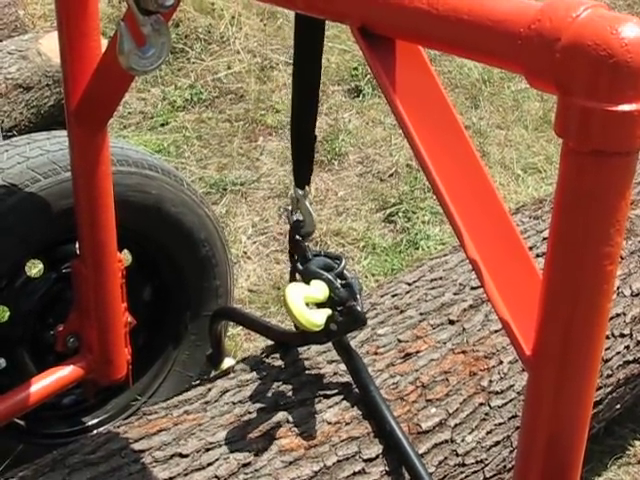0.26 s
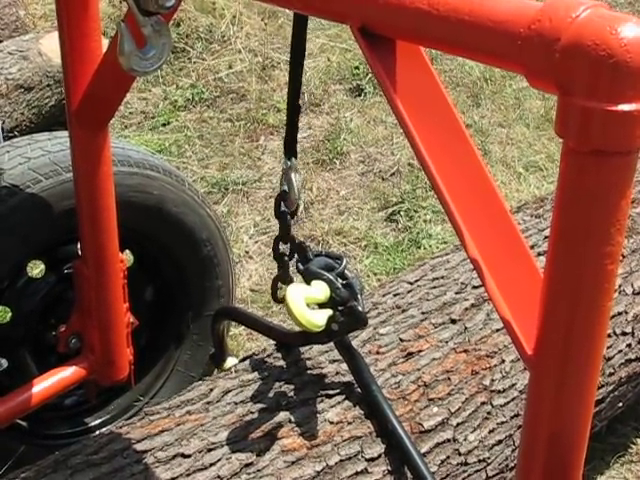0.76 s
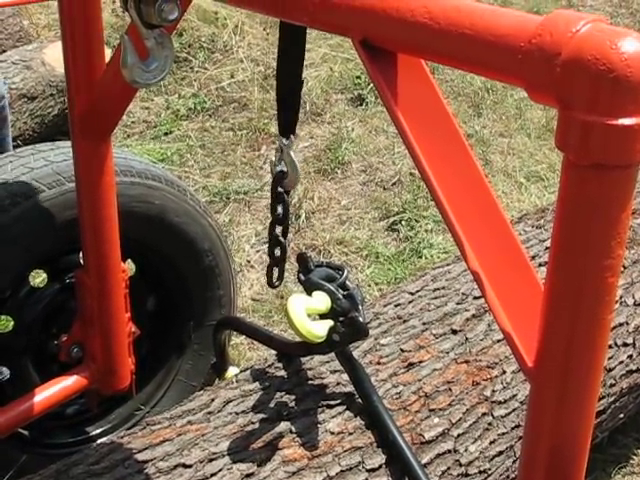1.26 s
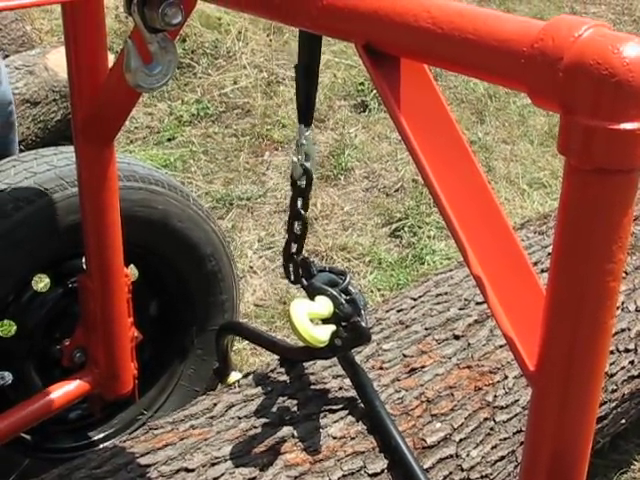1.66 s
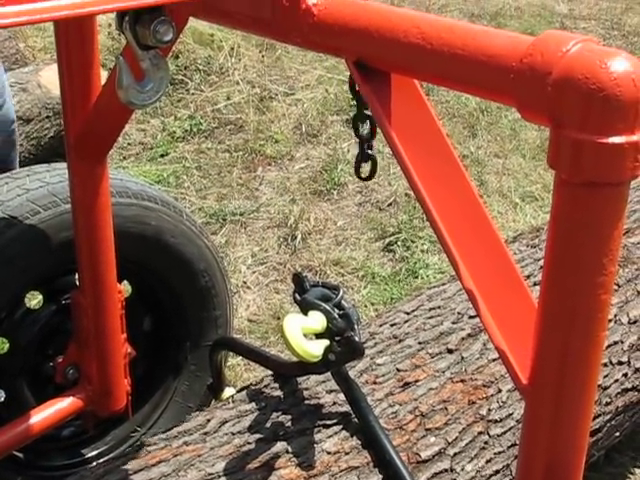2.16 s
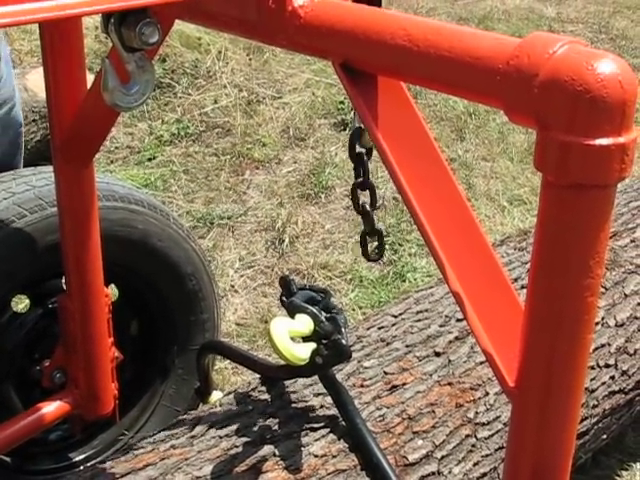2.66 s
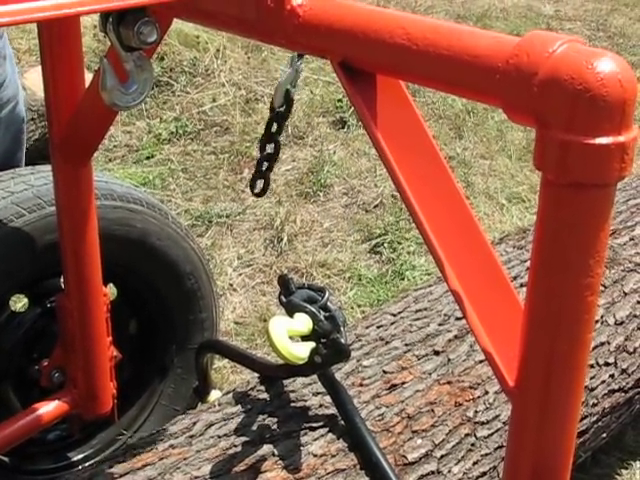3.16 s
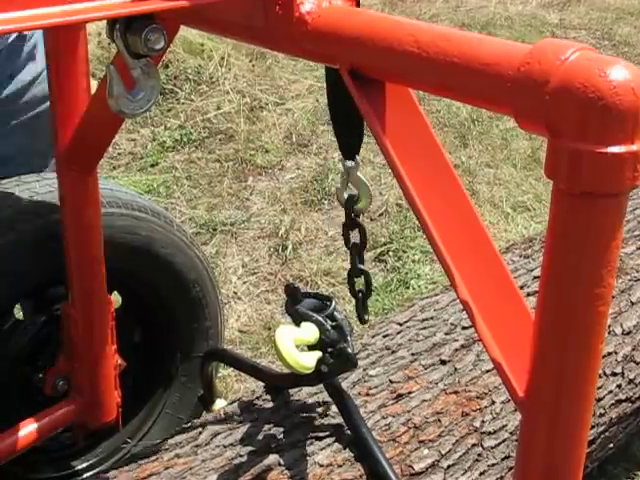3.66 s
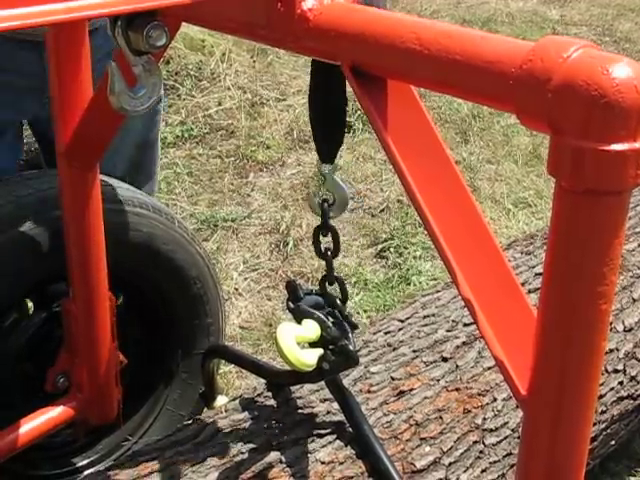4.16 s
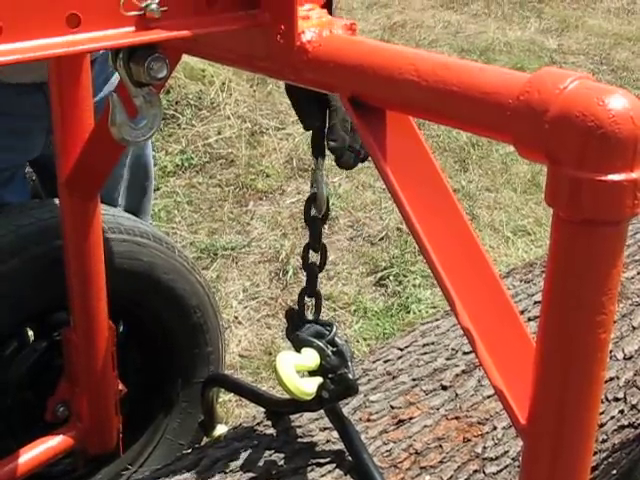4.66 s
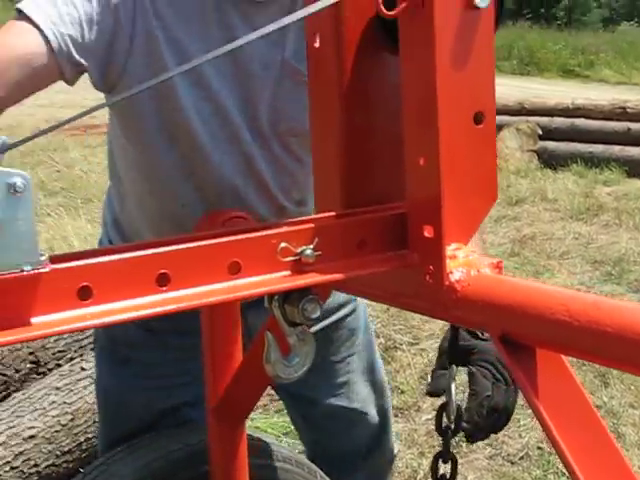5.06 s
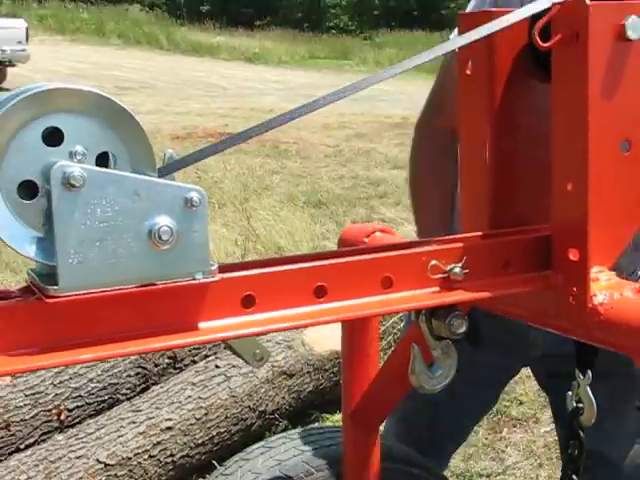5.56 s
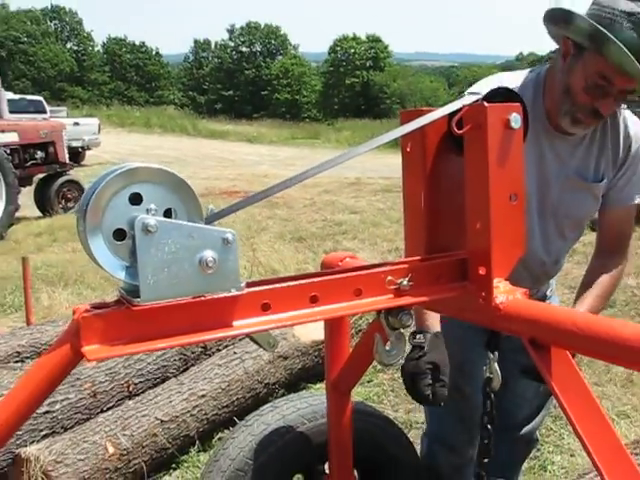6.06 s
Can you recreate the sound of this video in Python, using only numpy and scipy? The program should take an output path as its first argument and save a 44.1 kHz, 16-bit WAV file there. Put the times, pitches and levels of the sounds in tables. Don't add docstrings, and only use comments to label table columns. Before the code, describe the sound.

A close hand winch on a steel frame, in an open field. One hard metallic clack comes at once, then dull knocks up to 0.5 s. From 0.5 to 1.4 s about fifteen loud, bright ratchet clicks run at roughly fifteen a second, each snapping and ringing briefly through drum and tubes. Small ticks follow; from 1.85 s wind rumbles on the microphone and loose chain scrapes and jingles, with a stronger clink near 2.9 s. Faint birds whistle between 2.3 and 3.5 s, and insects hiss briefly near 2.8 s. A second burst of twenty-five clicks runs from 3.55 to 5.3 s, slower and uneven at first, then quickening, with tiny axle creaks. Knocks near 5.5 s and soft hand thumps and ticks at 6.2 s end it. Thin air, a high steady tone and distant machine drone and hum duck under clicks, then recover.

```python
import sys
import numpy as np
from scipy import signal
from scipy.fft import rfft, irfft, next_fast_len
from scipy.io import wavfile
from scipy.ndimage import uniform_filter1d, minimum_filter1d, map_coordinates

SR = 44100
rng = np.random.default_rng(int(sys.argv[2]) if len(sys.argv) > 2 else 0)


def convert_level_to_amplitude(level_db):
    exponent = np.asarray(level_db, float) / 20
    return 10 ** exponent


def log_audio(samples):
    frames = np.atleast_2d(samples).T
    limited = np.clip(frames, -1, 1)
    pcm = np.round(limited * 32767).astype(np.int16)
    wavfile.write(sys.argv[1], SR, pcm)


N = 278712
HZ = np.fft.rfftfreq(next_fast_len(N + SR), 1 / SR)
BURST_HZ = np.fft.rfftfreq(128, 1 / SR)

# t/s, peak level/dB, edge ring re peak/dB, thud re peak/dB, bell ring/dB
LONE = [
    (0.0262, -5.5, -10, -41, -7),
]
FIRST = [(0.508, -4, -12, -36, -2), (0.5698, -5.0, -14, -40, 5.5), (0.6264, -4, -12.5, -46.5, 0.5),
         (0.6829, -3.5, -13.5, -47, 1), (0.7351, -3, -13, -46.5, -6.5), (0.7856, -5.5, -14, -49.5, -2),
         (0.838, -4, -12.5, -32.5, 10), (0.8992, -3, -12.5, -50, 5), (0.963, -2, -11, -37, 3.5),
         (1.0272, -5.0, -9.5, -54, 3.5), (1.099, -5, -12.5, -35.5, -2), (1.1713, -4, -14, -38, 3),
         (1.2355, -4.5, -15, -34, 3), (1.2971, -6, -12, -45.0, -2), (1.3784, -6, -9.5, -32.5, 1.5)]
SECOND = [(3.5592, -4.5, -10.5, -37, 3.5), (3.6314, -6, -6.5, -33, 3.5), (3.7119, -4, -11, -37, 0.5),
          (3.8333, -4.5, -10.5, -35, -3.5), (3.9383, -3.5, -14, -59, -5.5), (4.0289, -3.5, -16, -53, -1),
          (4.1268, -6, -10, -39, 2.5), (4.2151, -5, -14.0, -61.0, -5), (4.275, -3.5, -14.5, -50, -0.5),
          (4.3199, -4, -12.5, -48, -2), (4.3681, -6, -14.5, -44, 2), (4.4258, -4.0, -11, -45, 2.5),
          (4.4921, -3.5, -13, -31, -0.5), (4.5682, -4, -9, -31, 3), (4.6702, -5.5, -10, -60, 2.5),
          (4.7774, -5, -9.5, -38, -4.5), (4.8686, -5, -12, -38, 0.5), (4.9353, -3.5, -12, -47.5, -0.5),
          (4.9898, -4.5, -14.5, -45, 4.5), (5.0377, -5.0, -11, -44.5, 1), (5.081, -5.5, -14.5, -45, -6),
          (5.1215, -5, -10, -45, 2), (5.1637, -4.5, -18.5, -52, -1), (5.2083, -1.5, -15.5, -48.5, 0.0),
          (5.2714, -4.5, -11, -70.0, 3)]
DROPS = LONE + FIRST + SECOND


def unit(x):
    return x / np.sqrt(np.mean(x ** 2) + 1e-20)


def along(points, hz):
    f, v = np.transpose(points)
    return np.interp(np.log(hz + 1), np.log(f + 1), v)


def curves(rows):
    s, *cols = np.transpose(rows)
    return [np.interp(np.arange(N) / SR, s, c) for c in cols]


def wobble(rate):
    knots = rng.standard_normal(int(N * rate / SR) + 4)
    return map_coordinates(knots, [np.arange(N) * rate / SR])


def filtered(x, response):
    m = 2 * len(HZ) - 2
    return irfft(rfft(x, m) * response, m)[..., :N]


def add(track, s, sound):
    part = track[..., round(s * SR):round(s * SR) + sound.shape[-1]]
    part += sound[..., :part.shape[-1]]


def ring(hz, db, t60, t, attack, scatter_db):
    hz, db, t60 = (np.asarray(v)[:, None] for v in (hz, db, t60))
    strength, phase = rng.standard_normal((2, len(hz), 1))
    decay = convert_level_to_amplitude(db + scatter_db * strength - 60 * t / t60)
    waves = decay * np.sin(2 * np.pi * hz * t + 9 * phase)
    return waves.sum(0) * (1 - np.exp(-t / attack))


def puff(colour_db, t60, t, rise, alike):
    a, b = rng.standard_normal((2, len(t)))
    pair = [a, alike * a + np.sqrt(1 - alike ** 2) * b]
    _, frames, z = signal.stft(pair, SR, nperseg=128)
    gain = convert_level_to_amplitude(colour_db)
    gain = gain / np.sqrt(np.mean(gain ** 2))
    t60 = np.broadcast_to(t60, BURST_HZ.shape)[:, None]
    z = z * gain[:, None] * convert_level_to_amplitude(-60 * frames / t60)
    burst = signal.istft(z, SR, nperseg=128)[1][:, :len(t)]
    return burst * (1 - np.exp(-(t / rise) ** 2))


def rush(spectrum, alike, patchy_db):
    z = signal.stft(rng.standard_normal((2, N)), nperseg=512)[2]
    patches = uniform_filter1d(rng.standard_normal(z.shape[1:]), 6, 0)
    patches = uniform_filter1d(patches, 14, 1)
    pair = signal.istft(z * convert_level_to_amplitude(patchy_db * unit(patches)), nperseg=512)[1][:, :N]
    turn = np.arccos(np.clip(along(alike, HZ), -1, 1)) / 2
    mid, side = filtered(pair, convert_level_to_amplitude(along(spectrum, HZ)) * [np.cos(turn), np.sin(turn)])
    return unit(np.array([mid + side, mid - side]))


def whistles(notes, arch):
    out = np.zeros(N)
    for s, length, start_hz, end_hz, db in notes:
        u = np.linspace(0, 1, round(length * SR))
        pitch = (start_hz + (end_hz - start_hz) * u) * (1 + 4 * arch * u * (1 - u))
        wave = np.sin(2 * np.pi * np.cumsum(pitch) / SR)
        add(out, s, convert_level_to_amplitude(db + 2) * np.sin(np.pi * u) ** .6 * wave)
    return out * convert_level_to_amplitude(4 * wobble(150))


def camera_gain_db():
    deepest_db, load_per_click = 13, 1.17
    memory_s, grab_s = 0.36, 0.022
    t = np.arange(0, N / SR, .002)
    age = np.maximum(t - np.array([row[0] for row in DROPS])[:, None], 0)
    load = load_per_click * (np.exp(-age / memory_s) * (1 - np.exp(-age / grab_s))).sum(0)
    return np.interp(np.arange(N) / SR, t, -deepest_db * (1 - np.exp(-load)))


def hum():
    # f/Hz, level/dB, drift rate/(1/s)
    partials = [(133, 6, 1.5), (183, -2, 9), (264, -9, 7), (404, -11, 9)]
    t = np.arange(N) / SR
    total = np.zeros(N)
    for hz, db, rate in partials:
        strength = convert_level_to_amplitude(db + 5.4 * wobble(rate))
        total += strength * np.sin(2 * np.pi * hz * t + 1.8 * wobble(rate))
    return unit(total)


def field():
    # f/Hz, spectral level/dB
    air_colour = [(120, -17), (170, -6.5), (300, -20), (600, -17.5), (1000, -21), (2200, -21),
                  (4000, -22.5), (6500, -26.5), (8700, -24.5), (9100, -35), (12600, -38), (13400, -34.5),
                  (15750, -34), (15900, -70)]
    # f/Hz, coherence/1
    air_alike = [(60, -0.18), (240, 1), (950, 0.93), (3770, -0.17), (15000, 1)]
    # f/Hz, spectral level/dB
    drone_colour = [(250, -18.5), (340, 2), (480, -6), (650, -9.5), (780, 1.5), (950, -6), (1300, -17.5),
                    (2000, -59)]
    # t/s, drone level/dB, hum level/dB
    machine = [(0, -65, -73), (.3, -51.5, -50), (.9, -37.5, -70), (1.45, -39.5, -65), (1.75, -67.5, -84),
               (2.3, -54.5, -52.5), (2.6, -55.5, -50.5), (3, -70, -51), (3.5, -53, -60),
               (4.5, -39.5, -61.5), (5.3, -53, -72), (5.55, -43.5, -55), (6.32, -53, -82)]
    # f/Hz, spectral level/dB
    buffet = [(12, -27.5), (20, -1), (75, 2.5), (172, -9.5), (216, -23.5), (300, -13.5), (390, -54.5),
              (660, -120)]
    # t/s, level/dB
    gusts = [(0, -59.5), (.12, -70.5), (.4, -55.5), (.7, -62), (1.2, -66), (1.78, -63.5), (1.85, -37),
             (2.22, -44), (2.32, -52), (2.42, -51), (3.04, -52.5), (3.13, -45.5), (3.55, -55), (3.9, -72.5),
             (4.5, -51), (5.3, -67), (5.9, -71), (6.32, -58)]
    drone_db, hum_db = curves(machine)
    air = convert_level_to_amplitude(-51.5 + .4 * wobble(6)) * rush(air_colour, air_alike, patchy_db=1.1)
    tone_phase = 2 * np.pi * 8252 * np.arange(N) / SR + .3 * wobble(60)
    tone = convert_level_to_amplitude(-55.5 + 1.5 * wobble(30)) * np.sin(tone_phase)
    drone = convert_level_to_amplitude(drone_db) * rush(drone_colour, [(500, 0.25)], patchy_db=1.8)
    lumps = convert_level_to_amplitude(3.5 * np.array([wobble(9), wobble(11)]))
    wind = convert_level_to_amplitude(curves(gusts)[0] - 1.0) * unit(lumps * rush(buffet, [(30, 0.13)], patchy_db=1.0))
    total = air + tone + drone + wind + convert_level_to_amplitude(hum_db) * hum()
    return convert_level_to_amplitude(camera_gain_db()) * total * convert_level_to_amplitude([[1.6], [-1.6]])


def frame(t):
    # f/Hz, level/dB, T60/s
    modes = [(340, -18, 0.34), (832, -22, 0.6), (1200, -9, 0.2), (1541, -10, 0.8), (2160, -4, 0.28),
             (2632, -9, 0.28), (3273, -8, 0.4), (3413, -4, 0.25), (5712, -11, 0.19), (6046, -8, 0.2),
             (6239, -9, 0.42), (6476, -8, .3), (7311, -9, .25), (8560, -4, 0.2)]
    hz, db, t60 = np.transpose(modes)
    split = hz * (1 + 0.005 * rng.standard_normal(len(hz)))
    main = ring(hz, db, t60, t, attack=.003, scatter_db=3)
    return main + ring(split, db - 3, .75 * t60, t, attack=.003, scatter_db=3)


def housing(t, tilt):
    # f/Hz, bandwidth/Hz, level/dB
    housing_modes = [(1246, 164, 2.5), (1546, 54, -4), (2488, 140, 4), (3054, 34, -12.5), (3768, 126, 6),
                     (4347, 76, 4.5), (5065, 170, 3.5), (6075, 75, -5), (7000, 66, -6.5), (7760, 58, -9.5),
                     (9070, 98, -8.5), (9800, 100, -24), (11000, 41, -30), (12250, 59, -14.5),
                     (1178, 94, -2), (1864, 52, -10.5), (2240, 55, -8), (3440, 20.4, -16.5), (3853, 90, 2),
            (4490, 120, -6), (5707, 48, -14), (6165, 39, -11.5), (7310, 74, -7), (8610, 39, -12.5)]
    hz, width, level = np.transpose(housing_modes)
    turned = hz * (1 + .004 * rng.standard_normal(len(hz)))
    return ring(turned, level + along(tilt, hz), 3.0 / width, t, attack=0.00045, scatter_db=4)


def knocks():
    # t/s, peak level/dB, low tilt/dB, high tilt/dB
    dull = [(0.0034, -32, -22, -20), (0.1338, -36, 1, -2), (0.155, -36.5, 8, -6), (0.185, -31, 11, -18),
            (0.191, -19, -5, -9.5), (0.2371, -31.5, 8.5, -17), (0.4489, -40, 5, -12),
            (0.4813, -30, -0.5, -12.5), (2.169, -29, -10, -8), (2.1892, -38, 0, -13), (3.4594, -44.5, 0, 2),
            (5.4513, -47.5, -8, -17), (5.4757, -29.5, -12, -27), (5.4817, -26, -26, -11),
            (5.4917, -24, -0.5, 2.5), (5.603, -37.5, -1, -17), (5.6252, -39.5, -2.5, -8),
            (6.3088, -44.5, -1, 1)]
    # t/s, peak level/dB, low tilt/dB, high tilt/dB
    ticks = [(1.4865, -38, -17, 2), (1.5781, -49, -4, -4), (1.6321, -36, -19.5, -3),
             (1.9577, -47.5, -22, 1), (2.0303, -35, -16.5, 4.5), (2.3416, -43.5, -36, -7),
             (2.5179, -42, -24, -7), (3.1373, -36.5, -13, 5), (3.5294, -19.5, -10, 3),
             (5.3775, -36.5, -8, 7.5), (5.5285, -39, 0, -2), (5.9174, -54, -8, -14.5),
             (6.102, -48.5, 5, 12), (6.1998, -41.5, -16.5, 2), (6.2124, -36, -13, 5.5)]
    # t/s, peak level/dB, low tilt/dB, high tilt/dB
    take_up = [
        (.5, -17.5, -1.5, -4.2),
        (3.547, -16.5, -19, -6),
        (3.82, -31, -14, -10.5),
    ]
    # f/Hz, level/dB, T60/s
    hollow = [(880, -15, 0.045), (1085, 0.5, 0.17), (1497, -6, .06), (2070, 0, 0.12), (2350, -3.5, 0.072)]
    # t/s, peak level/dB
    thumps = [
        (6.201, -29),
        (6.212, -26),
        (6.256, -35.5),
    ]
    # f/Hz, level/dB, T60/s
    tube = [(180.6, 6, 0.035), (325, -2.5, 0.22), (736, 1, 0.029), (864, -1, 0.032)]
    out, t = np.zeros((2, N)), np.arange(SR // 4) / SR
    kinds = [(dull, 0.002, 0.075), (ticks, 0.00031, 0.04), (take_up, 0.00086, 0.031)]  # rise/s, T60/s
    for rows, rise, t60 in kinds:
        for s, db, low_db, high_db in rows:
            colour = [(250, low_db - 5.5), (900, low_db + 5.5), (2500, 0.0065),
                      (6000, high_db + 1.0), (9000, high_db - 5.5), (16000, high_db - 49)]
            decay = t60 * (1 + 400 / (BURST_HZ + 300))
            burst = puff(along(colour, BURST_HZ), decay, t, max(rise, .0004), alike=0.95)
            add(out, s - rise / 2, convert_level_to_amplitude(db - 1.5) * burst)
            add(out, s, convert_level_to_amplitude(db - 27.0) * frame(t) + convert_level_to_amplitude(db - 17.0) * housing(t, colour))
            walls = ring(*np.transpose(hollow), t, attack=rise, scatter_db=4.5)
            add(out, s, convert_level_to_amplitude(db + 0.9 * low_db - 17.0) * walls)
    for s, db in thumps:
        add(out, s, convert_level_to_amplitude(db - 4) * ring(*np.transpose(tube), t, attack=.002, scatter_db=2))
    return out


def ratchet():
    # f/Hz, spectral level/dB
    crash_colour = [(290, -30), (500, -30.5), (785, -22.5), (1200, -2.5), (1390, -6), (2450, -0.5),
                    (3270, -7), (4380, 1), (5450, -11.5), (7080, -5), (10000, -11), (12100, -7),
                    (16200, -27)]
    # f/Hz, T60/s
    crash_t60 = [(500, 0.09), (2000, 0.1), (5000, 0.062), (9000, 0.075), (10200, 0.028), (13000, .024),
                 (16000, .012)]
    # f/Hz, spectral level/dB
    after = [(400, -10.5), (1500, 0), (3300, -3.5), (5000, -12), (6500, 0), (8700, -9.5), (9600, -35),
             (11000, -69)]
    # f/Hz, level/dB, T60/s
    spring = [(9870, -7, .1), (11500, 5.5, 0.077), (13800, -15.5, .12), (14430, -9.5, .12)]
    # t/s, crack level/dB
    slams = [
        (0.026, 1),
        (0.5081, -2),
        (3.5586, -1),
    ]
    # f/Hz, level/dB, T60/s
    clank = [(423, -16, 0.014), (1177, -6, 0.016), (2250, -4, 0.02), (4480, -9, .02), (7700, -8, 0.015),
             (12900, -13, .012)]
    out, t, long_t = np.zeros((2, N)), np.arange(SR // 6) / SR, np.arange(SR // 2) / SR
    base = along(crash_colour, BURST_HZ)
    for s, db, edge_db, thud_db, bell_db in DROPS:
        off_db = edge_db + 14.5
        tilt = [(2900, 0.33 * off_db - 5.0), (3300, 0.1), (4050, 0.1), (4350, 1.0 * bell_db),
                (4750, 0.36 * bell_db), (5300, 0.1), (5700, off_db + 0.5),
                (9300, off_db - 0.5), (9700, 0.84 * off_db - 0.87)]
        crash = puff(base + along(tilt, BURST_HZ), along(crash_t60, BURST_HZ), t, rise=0.00051, alike=0.71)
        thud = ring([95, 183.6, 306.0, 450], [-16.5, 6.5, 5.0, 17.5], [0.041, 0.011, 0.023, 0.009],
                    t, attack=0.00097, scatter_db=0.5)
        blow = convert_level_to_amplitude(-9.5) * housing(t, tilt) + convert_level_to_amplitude(-6.5) * crash + convert_level_to_amplitude(thud_db + 1.7) * thud
        add(out, s, convert_level_to_amplitude(db) * blow)
        rattle = puff(along(after, BURST_HZ), 0.25, long_t[:SR // 3], rise=0.0016, alike=0.94)
        add(out, s, convert_level_to_amplitude(db - 26.0) * rattle)
        add(out, s, convert_level_to_amplitude(db - 34) * frame(long_t))
        add(out, s, convert_level_to_amplitude(db - 33.5) * ring(*np.transpose(spring), t, attack=0.0017, scatter_db=5.0))
        grind = puff(base - BURST_HZ / 400, 0.43, t[:300], rise=0.0027, alike=0.99)
        add(out, s - 300 / SR, convert_level_to_amplitude(db - 42.5) * grind)
    crack_colour = [(150, -10.5), (1000, 0.0), (8000, 0), (13000, -9), (16000, -12.5)]
    for s, db in slams:
        crack = puff(along(crack_colour, BURST_HZ), 0.011, t, rise=0.00089, alike=0.15)
        add(out, s, convert_level_to_amplitude(db) * crack)
        add(out, s, convert_level_to_amplitude(db) * ring(*np.transpose(clank), t, attack=0.00082, scatter_db=0.5))
    return out


def chain():
    # t/s, peak level/dB, scrape before the touch/s, ring share/1
    touches = [(1.8519, -37, 0.038, 0.23), (1.9188, -33, 0.039, 0.08), (1.9834, -40, 0.023, 0.03),
               (2.1578, -27.5, 0.026, 0.19), (2.1967, -52, 0.049, 0.1), (2.238, -42.5, 0.018, 0.8),
               (2.2449, -33.5, 0.017, 0.3), (2.383, -32, 0.027, 0.14), (2.4186, -31, 0.034, 0.12),
               (2.458, -34.5, 0.025, 0.08), (2.9034, -33.5, 0.039, 0.6), (2.9265, -18.5, 0.033, 0.34),
               (3.12, -47.5, 0.033, 0.1), (3.3009, -41.5, 0.022, 0.2)]
    # f/Hz, level/dB, T60/s
    links = [(4770, -9, .28), (5642, -16, .25), (5835, -12, .32), (6126, -14, .2), (6465, -7, .2),
             (6821, -4, .4), (7235, -5, .13), (7440, -7, .16), (8646, 0, .15), (9300, -14, .1)]
    out, t = np.zeros((2, N)), np.arange(SR // 3) / SR
    bright = [(2000, -10.0), (4500, -7.0), (6500, 5.0), (8800, -2), (10000, -9.5), (13000, -19), (16000, -45.5)]
    for s, db, scrape, share in touches:
        hiss = puff(along(bright, BURST_HZ), 0.12, t, scrape, alike=0.265)
        add(out, s - scrape, convert_level_to_amplitude(db + 2.0) * hiss)
        add(out, s, convert_level_to_amplitude(db - 1) * share * ring(*np.transpose(links), t, attack=.003, scatter_db=3))
    return out


def birds():
    # t/s, length/s, start f/Hz, end f/Hz, level/dB
    glides = [(2.28, .025, 4500, 4400, -61), (2.31, .035, 4400, 4050, -59), (2.45, .09, 3950, 3400, -58),
              (2.605, .02, 4000, 4050, -58), (2.765, .015, 4000, 4700, -62), (3.375, .03, 3250, 3500, -61),
              (3.41, .03, 3800, 4000, -59), (3.45, .03, 4300, 4400, -60)]
    # t/s, length/s, start f/Hz, end f/Hz, level/dB
    chirps = [
        (2.355, .02, 2950, 2950, -58),
        (2.565, .03, 2900, 2900, -58),
        (3.04, .025, 2900, 2900, -55),
    ]
    return whistles(glides, arch=-0.0234) + whistles(chirps, arch=0.105)


def insects():
    # t/s, half width/s, level/dB
    swell = (2.78, 0.18, -67)
    s, width, db = swell
    band = [(12500, -60), (13300, -6), (15000, 0), (15750, 0), (15900, -60)]
    envelope = np.exp(-((np.arange(N) / SR - s) / width) ** 2)
    return convert_level_to_amplitude(db) * envelope * rush(band, [(500, .6)], patchy_db=1.0)


def axle():
    # t/s, length/s, start f/Hz, end f/Hz, level/dB
    creaks = [
        (3.995, .034, 1195, 1205, -41),
        (4.955, 0.036, 1240, 1200, -38),
        (3.806, .014, 8000, 7800, -48),
    ]
    return whistles(creaks, arch=0)


def at_ports(near):
    # f/Hz, level/dB
    lean = [(60, -2.5), (110, 7.5), (200, 3.5), (380, 5), (700, 3.5), (1290, 2), (2380, -3.5), (4400, 7),
            (8120, 0), (15000, 16.5)]
    # f/Hz, phase/rad
    lead = [(700, .3), (2000, .2), (2900, 1.1), (3700, 2.1), (7400, 1.1), (8800, 1.8), (10500, 3.8),
            (15500, 3)]
    side = np.array([[.5], [-.5]])
    bass_cut = HZ ** 2 / (HZ ** 2 + 70 ** 2)
    return filtered(near, convert_level_to_amplitude(side * along(lean, HZ)) * np.exp(1j * side * along(lead, HZ)) * bass_cut)


def scene():
    chain_pan = convert_level_to_amplitude([[-2], [2]])
    winch = knocks() + ratchet() + chain() * chain_pan + axle()
    return field() + at_ports(winch) + birds() + insects()


def limited(x):
    hold_s, knee = 0.0015, 9.9
    span = round(hold_s * SR)
    peak = uniform_filter1d(-minimum_filter1d(-np.abs(x).max(0), span), span)
    ceiling = convert_level_to_amplitude(5 + 0.42 * camera_gain_db())
    return x / (1 + (np.abs(peak) / ceiling) ** knee) ** (1 / knee)


def top_cut(x):
    return signal.sosfilt(signal.butter(12, 16400, fs=SR, output="sos"), x)


def record(dry):
    band = 1 / (1 + (HZ / 16300) ** 40)
    mix = np.clip(limited(filtered(dry, band)), -1, 1)
    return top_cut(mix)


dry = scene()
out = record(dry)
log_audio(out)
```